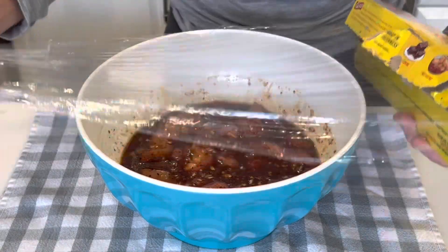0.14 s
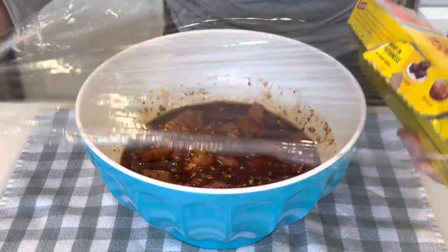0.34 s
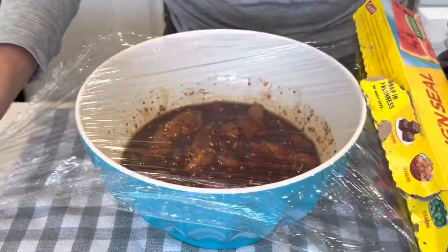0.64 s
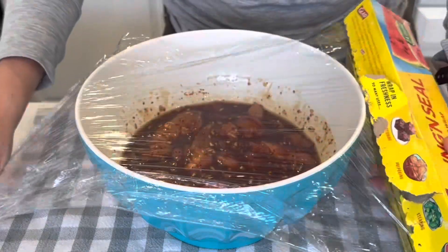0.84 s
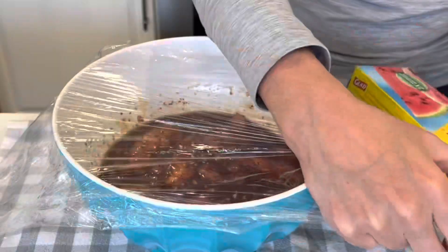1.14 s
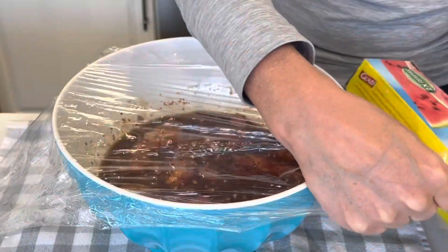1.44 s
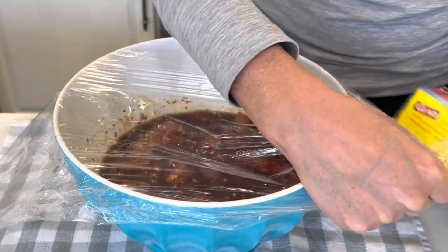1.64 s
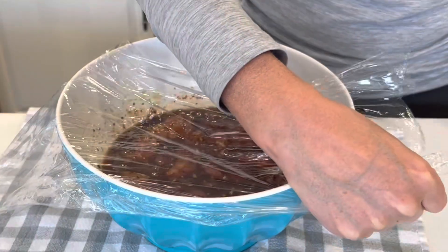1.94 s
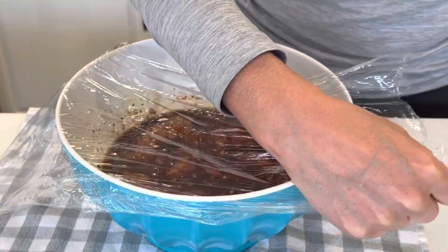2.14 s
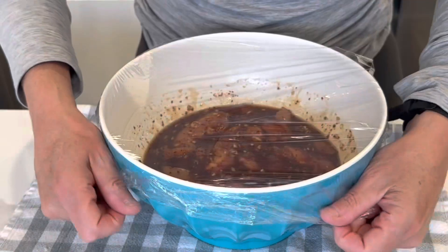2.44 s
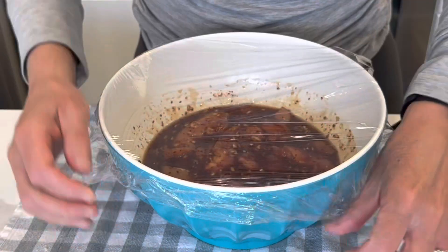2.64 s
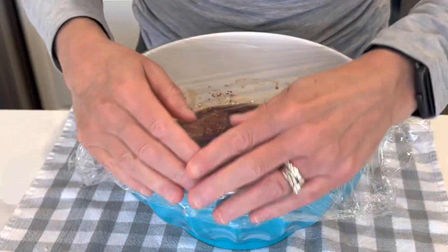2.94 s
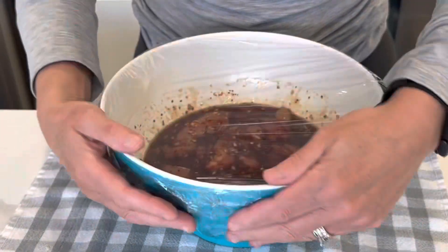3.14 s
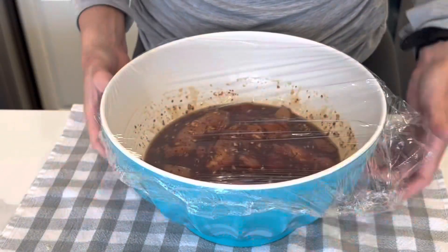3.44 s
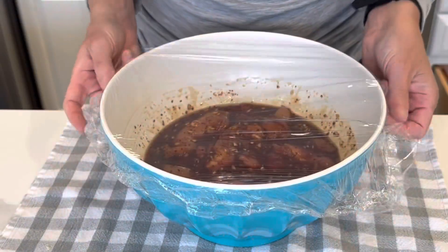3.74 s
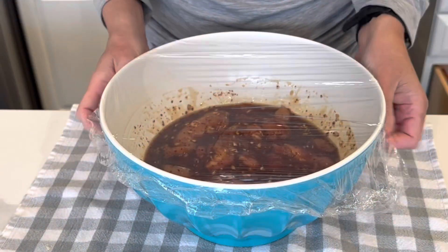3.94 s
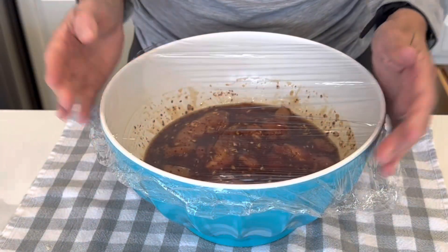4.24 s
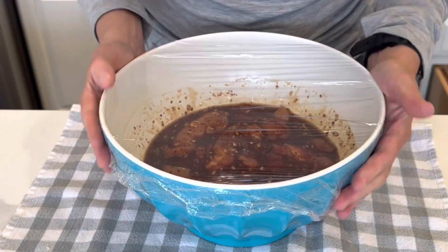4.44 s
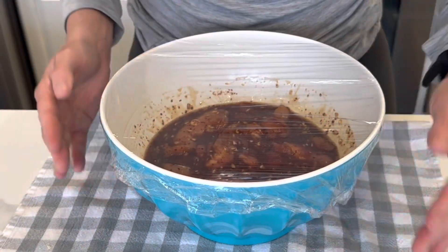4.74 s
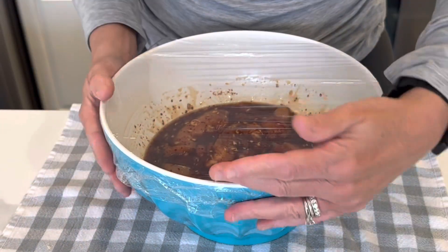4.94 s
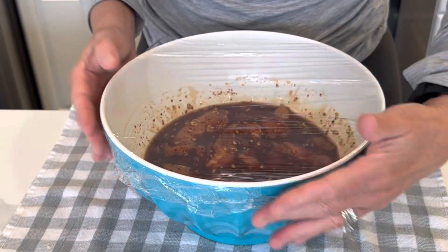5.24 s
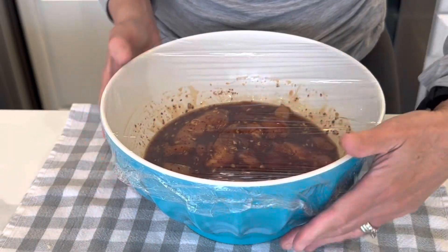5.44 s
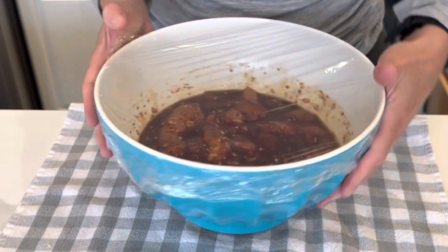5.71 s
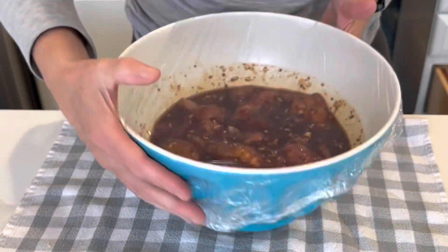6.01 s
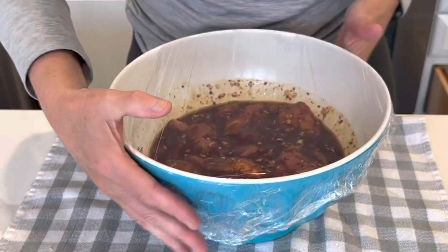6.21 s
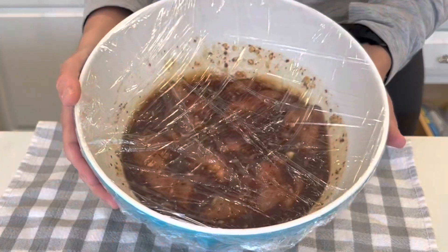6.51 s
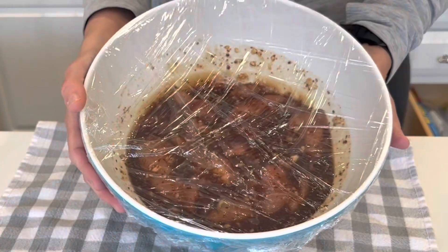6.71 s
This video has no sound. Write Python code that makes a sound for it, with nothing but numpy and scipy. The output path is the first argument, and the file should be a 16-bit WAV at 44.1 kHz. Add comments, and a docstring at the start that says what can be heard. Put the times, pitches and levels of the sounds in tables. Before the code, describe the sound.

Plastic cling film rustles, tears off its box with crackling snaps, then is smoothed over a ceramic bowl with three bright ring clacks in a quiet kitchen.

```python
"""In a small kitchen, cling film is pulled over a ceramic bowl, torn off its cardboard box and smoothed by hand.
Strokes rustle and crinkle (coloured noise and countless tiny pitched grains); the taut film snaps (noise puffs
and a drum-like tone). A finger ring clacks three times on the full bowl (damped modes), which is at last lifted
and set back on its cloth with low thuds (damped sines). A low hum lies under it all, heard in stereo."""
import sys
import numpy as np
from scipy import signal
from scipy.fft import rfft, irfft, next_fast_len
from scipy.io import wavfile
from scipy.ndimage import map_coordinates

SR = 44100
rng = np.random.default_rng(int(sys.argv[2]) if len(sys.argv) > 2 else 0)


def inscribe(sig):
    """Save sig as 16-bit PCM at rate SR to the path in sys.argv[1].

    A 1-D sig is mono; a 2-D sig holds one channel per row.
    Samples are clipped to [-1, 1] before scaling.
    """
    pcm = np.round(np.clip(np.atleast_2d(sig).T, -1, 1) * 32767)
    wavfile.write(sys.argv[1], SR, pcm.astype(np.int16))


N = 303011

# Resonances of what the hands rub and pull: hollow box and bowl, the sheet's body, its sharp cracks.
# Each row: frequency in Hz, relative density in dB per Hz.
HOLLOW_SPECTRUM = [(30, -36.5), (60, -13), (130, -2.5), (280, -1), (550, -2), (900, -13), (2000, -45)]
BODY_SPECTRUM = [(250, -29), (550, -2), (850, 0.5), (1500, -5), (2800, -9), (4500, -23.5), (9000, -45)]
CRACK_SPECTRUM = [(1500, -30), (3200, 2.5), (4500, 0), (6500, 0.5), (8500, 0.5), (10500, -3.5), (12500, -2),
                  (14000, 2), (16000, -10.5)]


def amp(db):
    """Decibels to gain."""
    return 10 ** (np.asarray(db) / 20)


def unit(x):
    """Scale to rms 1."""
    return x / np.sqrt(np.mean(x ** 2) + 1e-20)


def along(points, hz):
    """Read (Hz, value) points at hz, on a log frequency axis."""
    f, v = np.transpose(points)
    return np.interp(np.log(hz + 1), np.log(f + 1), v)


def wobble(rate):
    """A smooth random curve with rate knots a second."""
    return map_coordinates(rng.standard_normal(2000), [np.arange(N) * rate / SR], mode="wrap")


def filtered(x, response):
    """Shape x by a gain that is a function of frequency."""
    n = x.shape[-1]
    padded = next_fast_len(n + 8192)
    spectrum = rfft(x, padded) * response(np.fft.rfftfreq(padded, 1 / SR))
    return irfft(spectrum, padded)[..., :n]


def spread(pair, spectrum):
    """Two unrelated signals become a coloured left and right of rms 1, alike in the bass."""
    # Left and right are nearly opposite in phase around 11 kHz.
    # Each row: frequency in Hz, likeness of left and right from -1 to 1 (clipped just inside).
    alike = [(100, .94), (250, 0.66), (550, 0.41), (1300, 0.26), (3500, .18), (10000, .15), (10650, -1.1),
             (12050, -0.9), (12700, 0.766)]

    def response(hz):
        turn = np.arccos(np.clip(along(alike, hz), -.99, .99)) / 2
        return amp(along(spectrum, hz)) * np.array([np.cos(turn), np.sin(turn)])

    mid, side = filtered(pair, response)
    return unit(np.array([mid + side, mid - side]))


def noise(spectrum, n):
    """Coloured stereo noise, n samples long."""
    return spread(rng.standard_normal((2, n)), spectrum)


def add(track, s, sound):
    """Mix a sound into a track from time s on, cut at both ends of the track."""
    first = round(s * SR)
    sound = sound[..., max(-first, 0):]
    part = track[:, max(first, 0):][:, :sound.shape[-1]]
    part += sound[..., :part.shape[1]]


def in_kitchen(sound, wet_db, gap=0.0059, build=0.002):
    """A short sound with its own room tail, which begins after gap s and builds up over build s."""
    # Each row: frequency in Hz, time to decay by 60 dB in s.
    decay_times = [(120, 0.12), (500, 0.45), (3000, 0.4465), (8000, 0.4), (15000, 0.071)]
    # What the walls return. Each row: frequency in Hz, relative level in dB.
    wall_return = [(100, 5), (600, -1), (3000, -3.5), (8500, 3.5), (10500, -11.5), (15000, 1)]
    t = np.arange(SR // 2) / SR
    hz, frames, z = signal.stft(noise(wall_return, len(t)), SR, nperseg=256)
    decay = amp(-60 * frames / along(decay_times, hz)[:, None])
    tail = signal.istft(z * decay, SR, nperseg=256)[1][:, :len(t)]
    tail = tail * np.clip((t - gap) / build, 0, 1)
    response = amp(wet_db) * unit(tail) / np.sqrt(len(t))
    response[:, 0] += 1  # the direct sound
    return signal.fftconvolve(np.atleast_2d(sound), response, axes=1)


def burst(spectrum, t60, attack):
    """A puff of coloured noise that dies away, scaled to a noise rms of about 1 at the envelope's peak."""
    t = np.arange(SR // 8) / SR
    envelope = amp(-60 * t / t60) * (1 - np.exp(-t / attack))
    puff = unit(noise(spectrum, len(t)) * envelope)
    return puff * np.sqrt(np.mean(envelope ** 2)) / envelope.max()


def kitchen_hum(quiet_db=-65):
    """The kitchen's low hum: steady noise, weighted to the bass."""
    # Each row: frequency in Hz, relative density in dB per Hz.
    hum_spectrum = [(22, -22), (45, -2.5), (75, -2), (95, 6), (116, -5.5), (170, -3.5), (300, -12.5),
                    (500, -9), (800, -27), (1600, -32), (6000, -33), (16000, -49)]
    return amp(quiet_db) * noise(hum_spectrum, N)


def thuds(scuff_db=-14, rise_cycles=0.256):
    """A soft landing: a low damped swing of the counter and a dull scuff; the lower it is, the softer it starts."""
    # Landings and bumps of box and bowl.
    # Each row: start in seconds, level in dB, pitch in Hz, time to decay by 60 dB in seconds.
    landings = [(0.939, -42, 308, 0.0535), (1.531, -35, 220, 0.066), (1.661, -41.5, 163.1, 0.053),
                (1.88, -28, 410, 0.081), (1.883, -16, 261, 0.028), (5.6, -53, 110.3, 0.13),
                (5.874, -42.5, 254, 0.035), (6.098, -27.5, 79.3, 0.081), (6.123, -32, 103.6, .11),
                (6.207, -45, 78, 0.1496), (6.295, -52, 88, .16)]
    track, t = np.zeros((2, N)), np.arange(SR // 4) / SR
    for s, db, hz, t60 in landings:
        scuff = noise([(hz / 10, -30), (hz / 2, -3), (hz, 0), (hz * 2.7, -7), (hz * 8, -40)], len(t))
        swing = np.sin(2 * np.pi * hz * t) + amp(scuff_db) * scuff
        envelope = amp(-60 * t / t60) * (1 - np.exp(-t * hz / rise_cycles)) ** 2
        add(track, s, amp(db) * in_kitchen(swing * envelope, wet_db=-9.5))
    return track


def clacks(contact_db=-21, side_phase=0.57, lowest_hz=420):
    """The ring strikes the bowl with a dry tick; each spot wakes the damped modes at other strengths."""
    # Ring against bowl, with a skitter after the first blow.
    # Each row: start in seconds, level in dB, spot on the bowl (0, 1 or 2).
    blows = [(4.2834, 1.4, 0), (4.2851, -4.5, 0), (4.461, -25, 1), (4.468, -29, 1), (4.477, -24, 1),
             (4.488, -23.5, 1), (4.504, -25, 0), (4.9035, 3, 1), (5.2821, .5, 2)]
    # Bowl modes, damped by hands and film.
    # Each row: frequency in Hz, width in Hz, then relative level in dB when struck at spot 0, 1 and 2.
    bowl_modes = [(666, 670, 4.5, -1.5, 4), (1045, 96, -0.5, 13, 13.5), (1350, 280, 12.5, 4.5, 3),
                  (1723, 170, 6.5, 14.5, 4), (1974.4, 80, 11.5, 20, 11.5), (2370, 420, 10.5, 7.5, 10.5),
                  (2617, 180, 18, 22, 11.5), (2862.5, 53, 7.5, 20, 18.5), (2966, 46, 22.5, 21, 10.5),
                  (3310, 110, 16, 22.5, 21), (3752, 200, 8.5, 19, 16.5), (3937, 70, 20, 11.5, 20),
                  (4360, 180, 13, 9.5, 16), (4750, 130, 7.5, 11.5, 15.5), (5330, 250, 5.5, 8, 14),
                  (6260, 190, 8.5, 5, 2.5), (7008, 39, 15, 6.5, 9.5), (7520, 200, 8.5, 7.5, 6),
                  (7970, 70, 12.5, 0.5, 4), (8220, 40, 5.5, 11.5, 18), (8856, 140, 9, 6.5, 5),
                  (8885, 320, 15, 14, 15.5), (9833, 98, 16, 4, 12), (12050, 200, 2.5, 1, 8.5),
                  (12670, 200, 15, 10.5, 4.5), (14200, 500, 6.5, 1, -4)]
    # Metal touching glaze. Each row: frequency in Hz, relative density in dB per Hz.
    tick_spectrum = [(150, -22), (800, -1.5), (2200, -0.5), (5500, -6), (10000, -8), (16000, -15)]
    track, t = np.zeros((2, N)), np.arange(SR // 8) / SR
    hz, width, *spots = np.transpose(bowl_modes)
    radiation = signal.butter(2, lowest_hz, "high", fs=SR, output="sos")  # too small to radiate bass
    decay = np.exp(-np.pi * width[:, None] * t)
    # Neighbouring modes swing in opposite senses; left and right part in phase, more so for higher modes.
    k = np.arange(len(hz))
    lean = side_phase * (hz / 3000) ** .25 * (-1) ** (k // 2)
    for s, db, spot in blows:
        strength = amp(spots[int(spot)]) * 2 * np.pi * width / SR
        scatter = 0.31 * rng.standard_normal((2, len(hz)))  # radians
        phase = np.pi * k + np.array([lean, -lean]) + scatter
        modes = np.sin(2 * np.pi * hz[:, None] * t + phase[..., None]) * decay
        ringing = signal.sosfilt(radiation, strength @ modes * (1 - np.exp(-t / 0.0003)))
        tick = amp(contact_db) * burst(tick_spectrum, t60=0.0069, attack=0.00027)
        add(track, s, amp(db) * in_kitchen(ringing, wet_db=-4.5, gap=0.0032, build=0.0053))
        add(track, s - .0005, amp(db) * in_kitchen(tick, wet_db=-4.0))  # first touch, through the film
    return track


def snaps(box_db=-7, bowl_db=-13, crack_db=2, creep_db=-14, drum_db=3.5, drum_t60=0.034):
    """The film creeps, then cracks; the taut sheet pops like a small drum, and box or bowl sounds with it."""
    # Film snapping taut and ripping along the cutter. Each row: start in seconds, body level in dB,
    # crack over body in dB before crack_db or creep_db is added, pitch of the taut sheet in Hz.
    snap_events = [(.6436, -51, -14.5, 585), (0.8067, -49.5, -9, 1438), (1.0207, -53.5, -2, 678),
                   (1.0524, -50, -11, 690), (1.119, -42.5, -0.5, 640), (1.1519, -43.5, -6.5, 626),
                   (1.2638, -43.5, -15, 726), (1.3983, -43.5, -1.5, 659), (1.4047, -37.5, -1, 738),
                   (1.4397, -40.5, 1, 618), (1.5035, -31.5, -5.5, 1190), (1.5303, -34, 3.5, 876),
                   (1.6521, -28.5, -2.5, 893), (1.733, -41.5, 5, 884), (1.8092, -36.5, 2.5, 700),
                   (2.1283, -56.5, 3, 650), (2.37, -38.5, 5, 650), (2.568, -59.5, 6.5, 930),
                   (2.601, -61.5, 11, 882.9), (2.6202, -50, 4, 972), (3.304, -33, -10, 953),
                   (3.3233, -46.5, 1, 680), (3.3358, -42.5, -5.5, 478), (3.962, -62, 8, 901.4),
                   (5.863, -72, 9, 905)]
    torn_off_s = 1.9  # the box sounds until here, the bowl afterwards
    track, t = np.zeros((2, N)), np.arange(SR // 8) / SR
    for s, db, bright, hz in snap_events:
        hollow_db = box_db if s < torn_off_s else bowl_db
        snap = amp(hollow_db) * burst(HOLLOW_SPECTRUM, t60=0.071, attack=0.00213)
        snap += burst(BODY_SPECTRUM, t60=0.042, attack=0.00076)
        snap += amp(bright + crack_db) * burst(CRACK_SPECTRUM, t60=.02, attack=0.000364)
        snap += amp(drum_db - 60 * t / drum_t60) * np.sin(2 * np.pi * hz * t)
        add(track, s, amp(db) * in_kitchen(snap, wet_db=-7))
        creep = burst(CRACK_SPECTRUM, t60=0.052, attack=0.0018)[:, ::-1]  # swells up to the snap
        add(track, s - creep.shape[1] / SR, amp(db + bright + creep_db) * creep)
    return track


def effort(s, length, db):
    """Gain of a run of strokes: each one stirs, starts up, sags a little while it lasts, and dies away."""
    attack_s = 0.022  # a hand takes this long to get going
    touch_db, touch_db_per_s = -10.5, 200  # the film stirs as the hand takes hold: level at the start, rise
    sag_db_per_s, release_db_per_s = 7, 138.5
    power, t = np.zeros((1, N)), np.arange(-SR // 2, SR) / SR
    for start, hold, level in zip(s, length, db):
        touch = amp(touch_db + touch_db_per_s * np.minimum(t, 0))
        rise = np.maximum(np.minimum(t / attack_s, 1), touch)
        fall = sag_db_per_s * np.clip(t, 0, hold) + release_db_per_s * np.maximum(t - hold, 0)
        add(power, start - .5, (rise * amp(level - fall)) ** 2)
    return np.sqrt(power[0])


def crinkles(spectrum, per_second, ring, scatter_db, smear):
    """Countless creases buckle, each with its own pitch, size and place; the room smears a share to a hiss."""
    draw = rng.random((max(int(per_second * N / SR), 1), 5))
    t = np.arange(SR // 100) / SR
    low, high = spectrum[0][0], spectrum[-1][0]
    hz = low * (high / low) ** draw[:, :1]
    size = np.sqrt(hz) * amp(scatter_db * np.minimum(-np.log(draw[:, 1:2]), 3))
    grains = size * np.sin(2 * np.pi * (hz * t + draw[:, 2:3])) * np.exp(-t / ring)
    when = ((draw[:, 3:4] * N).astype(int) + np.arange(len(t))).ravel()
    place = 2 * np.pi * draw[:, 4:]
    sides = (np.cos(place), np.sin(place))
    pair = np.array([np.bincount(when, (grains * side).ravel(), N)[:N] for side in sides])
    # smear is the share of the power that is hiss
    return np.sqrt(1 - smear) * spread(pair, spectrum) + np.sqrt(smear) * noise(spectrum, N)


def handling(rub_db=-1, crinkle_db=-1.5, jerk_db=0.6666):
    """Hands drag the film in small jerks: box and bowl rub hollowly, the sheet rustles, its creases crinkle."""
    # Drawing the film off the box, then tearing it from 1.4 s on.
    # Each row: start in seconds, length in seconds, rustle in dB, crinkle over rustle in dB before
    # crinkle_db is added, hollow box over rustle in dB before rub_db is added.
    pulls = [(0, 0.2304, -63, -3, 6), (0.24, 0.27, -76, 5, -12), (0.462, 0.0302, -53.5, -5.5, 3.5),
             (0.535, 0.233, -64, -7, 4), (0.788, 0.17, -58.5, -11, 1), (0.879, 0.098, -55.5, -4.5, 0),
             (0.965, 0.045, -70, 7, 17), (1.094, 0.17, -57.5, -2.5, -1.5), (1.32, .08, -59.5, -4.5, -6.5),
             (1.385, 0.18, -45, -5, 1), (1.617, 0.13, -44, -1.5, -11.5), (1.791, 0.0246, -42, -7.5, 2.5),
             (1.875, 0.066, -55, -27, 8), (1.998, 0.073, -66, -10, 6.5)]
    # Hands pressing and smoothing the film on the bowl. Each row: the first four columns of a pull.
    strokes = [(2.106, 0.2, -63, 0), (2.34, 0.033, -50, 2), (2.482, 0.069, -67, 6),
               (2.594, 0.0293, -57.5, 2), (2.93, 0.1093, -61.5, 5), (3.064, .3, -64, 4),
               (3.459, 0.5607, -65, 1.5), (3.712, .11, -56.5, 1.5), (3.953, 0.026, -59.5, 6.5),
               (4.423, .09, -60.5, 10), (4.574, 0.0984, -70.5, 9), (4.93, .1, -58, 7.5),
               (5.31, 0.028, -59, 8), (5.48, 0.041, -65.5, 5), (5.619, 0.188, -80.5, 8.5),
               (5.8, 0.094, -76, 4.5), (6.07, 0.034, -69, 3.5), (6.195, .035, -77.5, 14),
               (6.484, 0.1, -71, -6.5)]
    # Palm rub over rustle before rub_db; it loses dB per dB of crinkle, as the touch gets lighter.
    palm_rub_db, rub_lost = 1, 0.24
    by_hand = [(s, length, db, bright, palm_rub_db - rub_lost * bright) for s, length, db, bright in strokes]
    s, length, db, bright, hollow = np.transpose(pulls + by_hand)
    rub = crinkles(HOLLOW_SPECTRUM, per_second=500, ring=0.016, scatter_db=2.5, smear=0.32)
    rustle = crinkles(BODY_SPECTRUM, per_second=700, ring=0.001, scatter_db=1.0, smear=0.55)
    crinkle = crinkles(CRACK_SPECTRUM, per_second=730, ring=.00015, scatter_db=4.0, smear=0.68)
    layers = effort(s, length, db + hollow + rub_db) * rub
    layers += effort(s, length, db) * rustle
    layers += effort(s, length, db + bright + crinkle_db) * crinkle
    return layers * amp(jerk_db * wobble(90))


def scene():
    """Film, box and bowl over the low hum of the kitchen; the lower tones lean to the right."""
    # Each row: frequency in Hz, left over right in dB.
    tilt = [(60, -1), (500, -2), (1200, -1), (2500, -1), (4800, 2), (8000, 3), (13000, -0.5)]
    sound = kitchen_hum() + thuds() + clacks() + snaps() + handling()
    return filtered(sound, lambda hz: amp(np.outer([.5, -.5], along(tilt, hz))))


def record(dry):
    """The level dips briefly three times; a steep band limit takes off the top."""
    # Each row: centre in seconds, seconds from the centre until the dip's depth has fallen to 1/e.
    dips = [(0.979, 0.016), (2.314, 0.015), (6.381, 0.021)]
    top_hz = 16200
    t = np.arange(N) / SR
    gain = np.prod([1 - 0.926 * np.exp(-((t - s) / half) ** 2) for s, half in dips], axis=0)
    return filtered(dry * gain, lambda hz: 1 / np.sqrt(1 + (hz / top_hz) ** 240))


dry = scene()
out = record(dry)
inscribe(out)
```